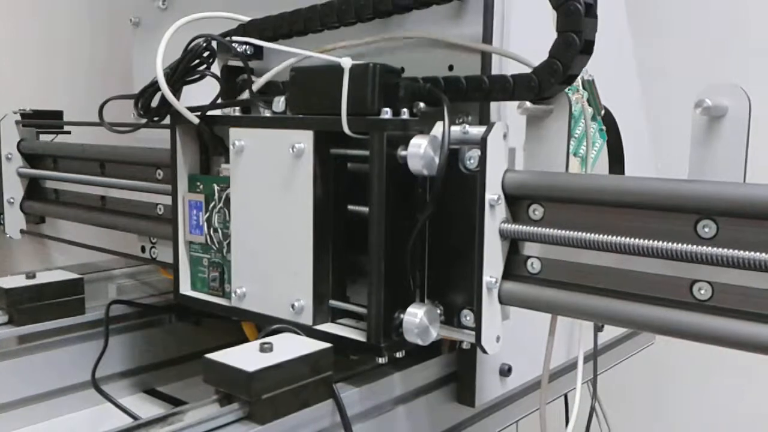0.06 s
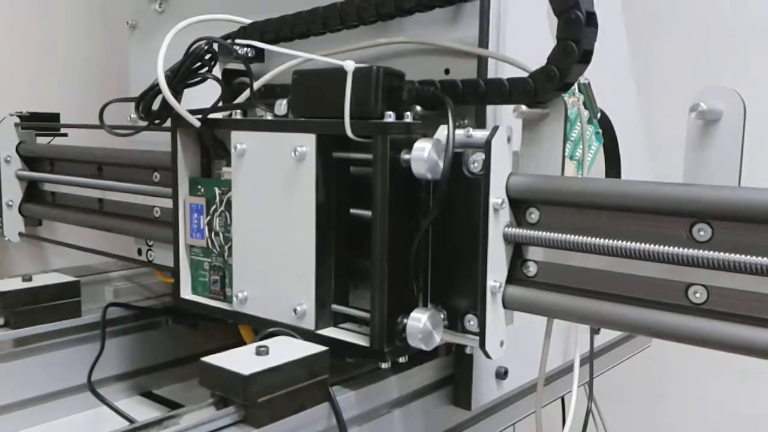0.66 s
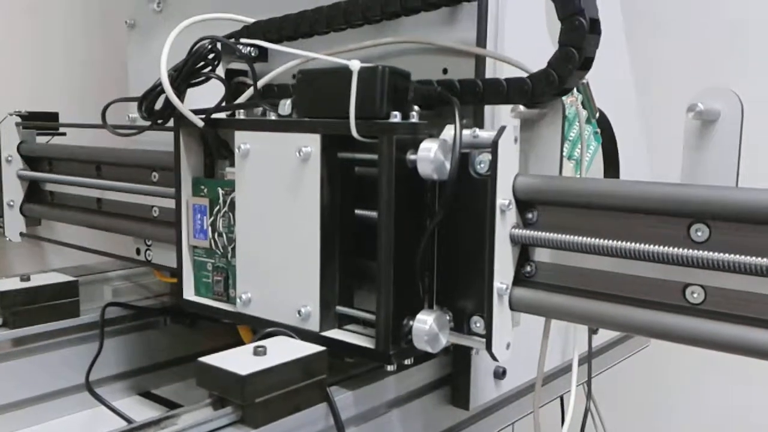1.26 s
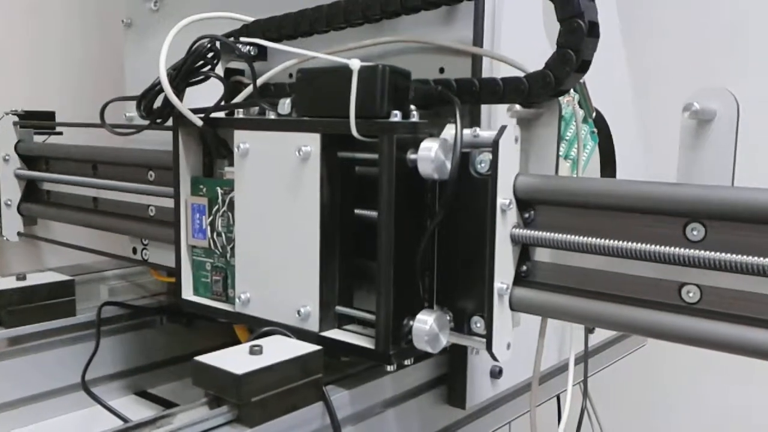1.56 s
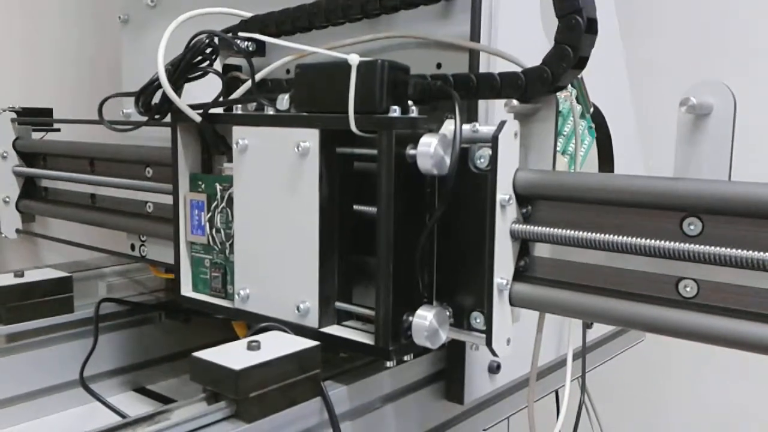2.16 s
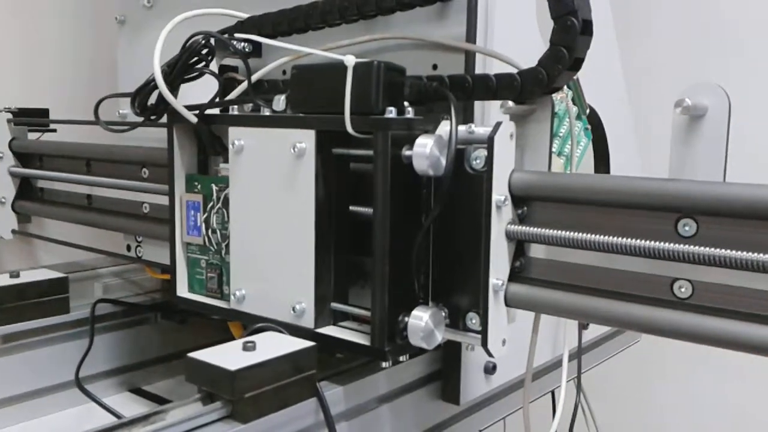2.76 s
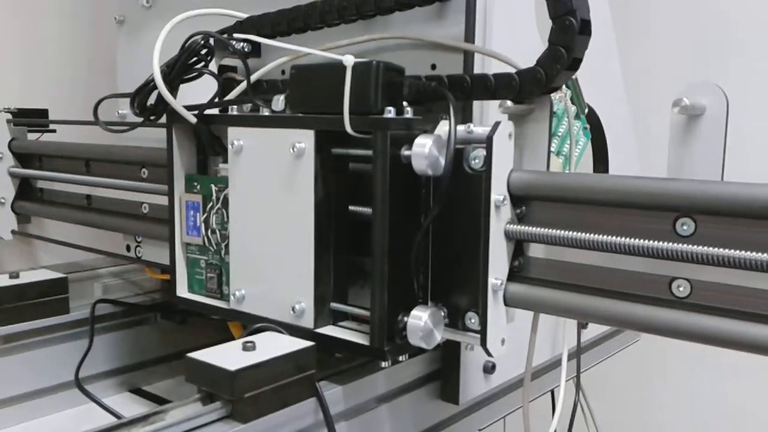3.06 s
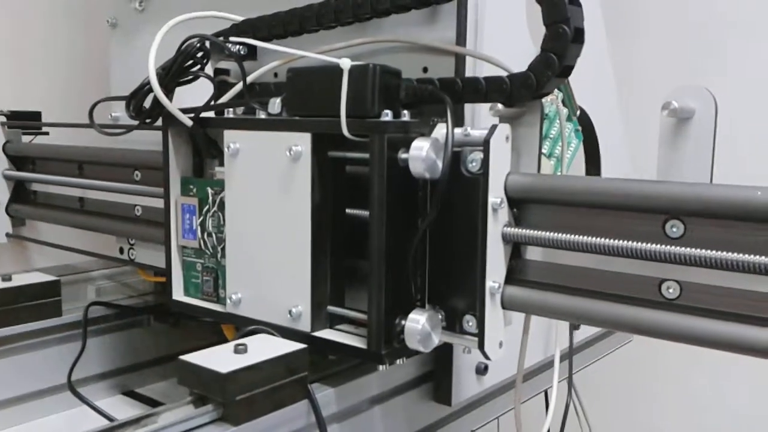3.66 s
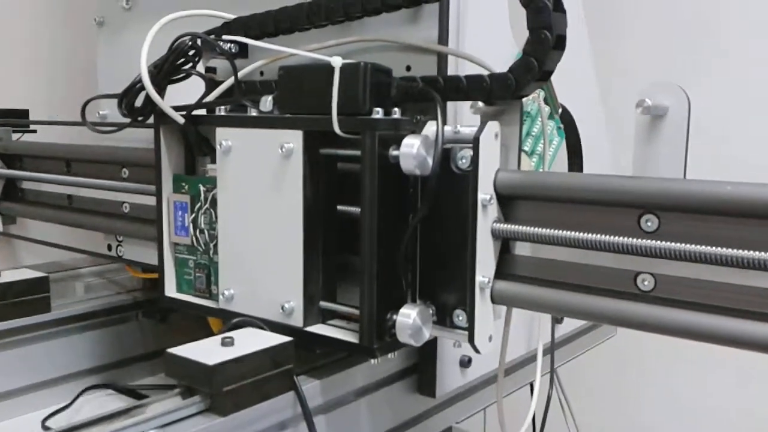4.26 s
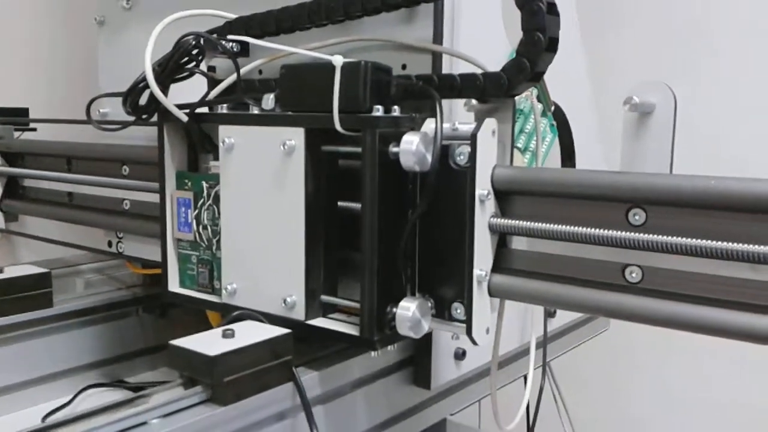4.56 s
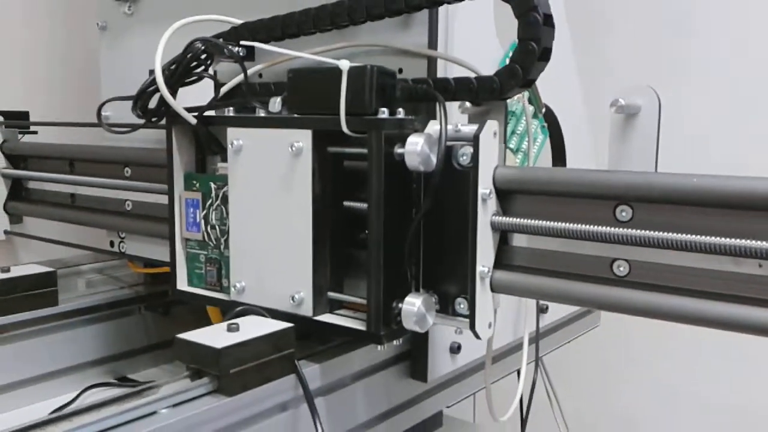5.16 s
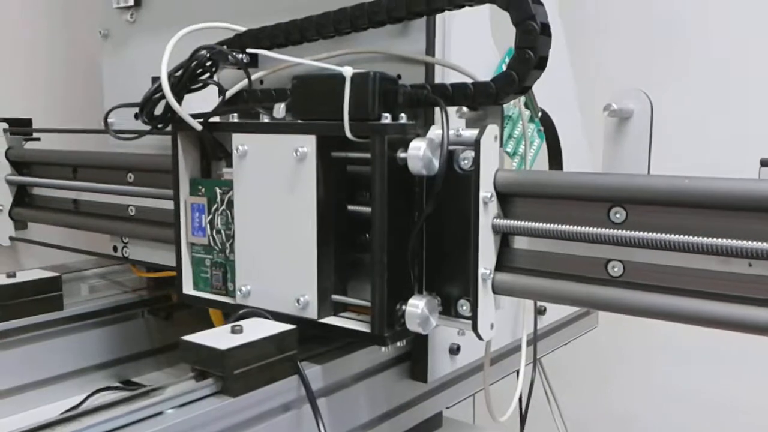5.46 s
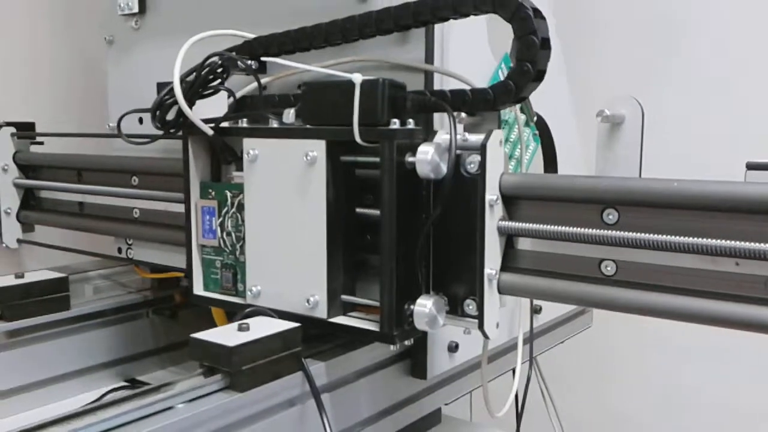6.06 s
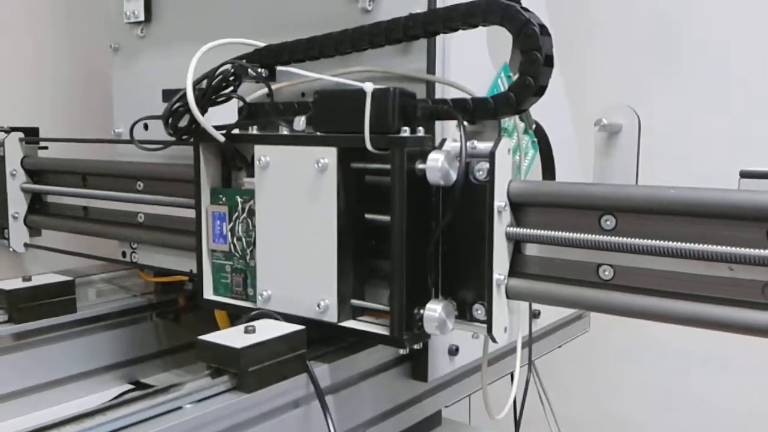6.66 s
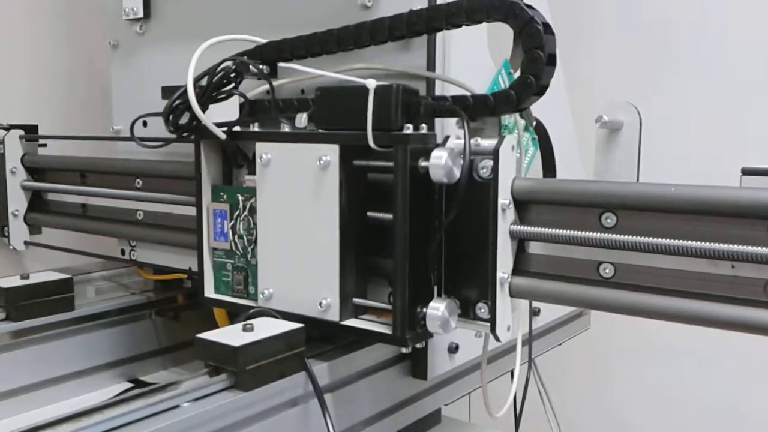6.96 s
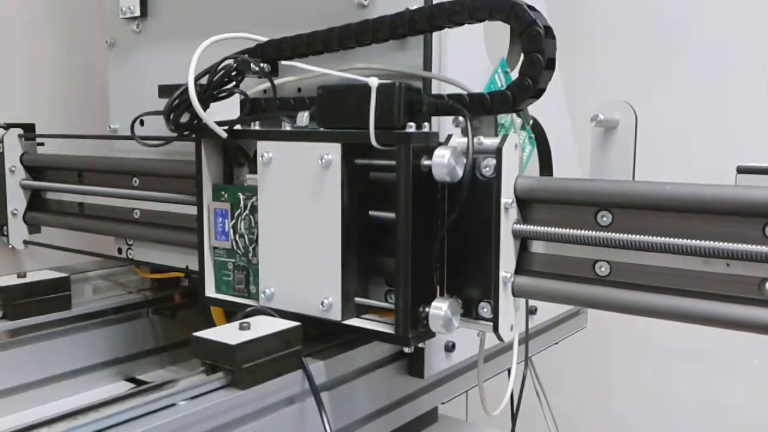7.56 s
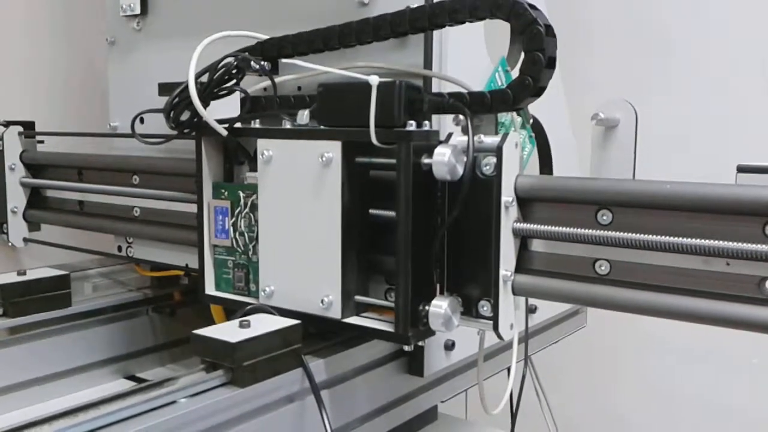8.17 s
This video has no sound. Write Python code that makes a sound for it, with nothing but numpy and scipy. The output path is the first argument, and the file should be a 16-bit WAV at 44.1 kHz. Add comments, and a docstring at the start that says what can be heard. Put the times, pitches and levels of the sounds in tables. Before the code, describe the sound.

A motorised carriage runs with a whine and metallic rattle, stops briefly, whirs back up for a longer run, then winds down.

```python
"""Stepper motor on a lead screw

A stepper drives a carriage along a screw, stops, ramps up, runs back and stops again.
The steps whine, swelling once per screw turn. The screw's roughness rattles the frame, which shudders
at middle speeds; rough overtones chirp on the ramps. The motor housing rings, the bearings hiss
and a cooling fan hums in a small workshop."""
import sys
import numpy as np
from scipy import signal
from scipy.fft import rfft, irfft, next_fast_len
from scipy.io import wavfile
from scipy.ndimage import map_coordinates

SR = 44100
rng = np.random.default_rng(int(sys.argv[2]) if len(sys.argv) > 2 else 0)


def pcm_store(signal):
    """Save signal as 16-bit PCM."""
    levels = np.round(np.clip(np.atleast_2d(signal), -1, 1) * 32767)
    wavfile.write(sys.argv[1], SR, levels.astype(np.int16).T)


N = 371753

STEPS_PER_TURN, CRUISE_STEPS_PER_S = 300, 1172
# Carriage moves. Each row: start, start of braking, one pass of the screw's tight spot, all in seconds.
MOVES_S = [(-1, 1.722, .077), (3.022, 7.49, 3.9)]
# Spin-up: creep, lurch, sag, climb. Each row: seconds since the start, speed as a share of cruise.
SPIN_UP = [(0, 0.0019), (.025, .17), (.075, .52), (.105, .555), (.19, .46), (.23, .51), (.3, .657),
           (.39, .775), (.49, .925), (.56, 0.98), (.66, 1)]
# Step harmonics. Each row: cruise level in dB, its speed exponent, mid-speed base level in dB,
# roughness 0-1, swell per turn in dB, swell lag in turns.
STEP_HARMONICS = [(-35.8, 4.2, -42.5, 0.2, 4.7, 0), (-40.5, 14, -57, 0.2, 1.9, 0.71),
                  (-34.3, 26, -50, 0.15, 1.6, 0)]
# Drift along the travel. Each row: time in seconds, offsets in dB for frame, nut, housing
# and harmonics 1 to 3, swell depth factor.
TRAVEL_DRIFT = [(0, 2.5, -1.172, 0.9, 0.5, 1.5, 0, 0.85), (1.7, 1.9, -0.1, 0.8, -0.5, 2.5, 0.5, 1.05),
                (3.6, 1, 0.4, 1.5, -0.5, -1.5, -1, 0.9), (4.3, 1, 0.15, 0, -3.5, 0.5, 0, 1.1),
                (5.2, -0.5, -0.041, -1.998, -1.3, -5, 2.5, 1),
                (6.2, -1.3, 0.19, -1.5, -0.5, -0.5, 3.5, 1.05), (7.45, -2.968, 0.16, 1, 0.7, -2, 1.3, 0.75)]
# Drive train tones; sidebands of step harmonic 2. Each row: cycles per turn, base level in dB.
DRIVE_ORDERS = [(30, -61), (80, -50), (90, -47.5), (120, -57.5), (150, -47.5), (156, -45), (160, -39.8),
                (164, -46), (170, -47.5), (180, -47), (184, -47.5), (190, -45), (220, -47), (240, -41),
                (288, -49), (320, -43.5), (330, -46.5), (360, -44), (380, -45), (420, -45), (474, -53),
                (520, -52), (680, -58), (818, -45.5), (836, -51), (980, -54), (1074, -52), (1203, -47.5),
                (1235, -46.5), (1252, -52), (1500, -64), (1800, -70), (2100, -61)]
SIDEBAND_ORDERS = [(598, -51), (604, -43), (610, -45), (612, -43)]
# Sideband strength. Each row: time in seconds, gain in dB.
SIDEBAND_GAIN = [(1.7, -9.5), (3.6, -22), (5, -3.5), (7.5, -3)]
# Drive of frame, nut, housing, bearings. Each entry: base level in dB, share of cruise for full drive,
# speed exponent below that, push gain in dB, swell per turn in dB, swell lag in turns,
# after-ring level in dB, its decay in dB/s.
PART_DRIVE = {"frame": (-34.5, 0.83, 2.5, 5.5, 0.95, 1.5, -1, 90),
              "nut": (-35.5, 0.8166, 1.6, -2, 0.57, 2, -1.5, 84),
              "housing": (-36.5, 0.82, 1, 3, 0.5, 0, -1.5, 95),
              "bearings": (-41.5, 0.83, 2.5, -2.5, 0, 0, -6, 110)}
# Spectra of the parts, the ramp overtones and the air. Each row: frequency in Hz, relative level in dB.
BED_SPECTRUM = [(65, -45), (100, -19), (122, -9.5), (170, -5), (250, -2.5), (320, -3.5), (420, 0.5),
                (480, -1.5), (560, -3.5), (800, -35)]
FRAME_SPECTRUM = [(480, -50), (565, -32), (605, -1.5), (690, -0.5), (790, -4), (905, -7.5), (970, -4.5),
                  (1060, -3.5), (1130, -2.5), (1300, -47)]
NUT_SPECTRUM = [(900, -33), (1080, -1), (1300, -.5), (1510, -0.5), (1640, 0.5), (1850, -5), (1950, -8.5),
                (2200, -7), (2350, -3.5), (2500, -9.5), (2800, -10), (3100, -5.5), (3220, 0.5), (3360, -9),
                (3520, -0.5), (3900, -19), (5000, -51)]
HOUSING_SPECTRUM = [(2500, -44), (3400, -12), (3750, -4.5), (3950, -5), (4120, 0.5), (4250, -2.5),
                    (4420, -3), (4570, -9), (4700, -3), (4880, -4), (5060, -19.5), (5400, -14), (6200, -29),
                    (9000, -40)]
BEARING_SPECTRUM = [(4000, -7), (5350, 4.5), (5800, -1), (6300, 1.5), (6850, -2.5), (7100, -4.5),
                    (7500, -2.5), (8200, -1), (8750, -7.5), (9600, -2.5), (10600, 0), (11500, -0.5),
                    (12700, -5.5), (14300, -20)]
FLANGE_SPECTRUM = [(4450, -30), (4620, -14), (4690, -2), (4750, -7.5), (4820, 3.5), (4910, -3), (4980, -12),
                   (5100, -32)]
CHIRP_SPECTRUM = [(500, -25), (950, -9), (1150, 3), (1350, -12), (1570, 3), (1750, -12), (2000, -13),
                  (2300, -6), (2650, -19), (3090, 5), (3350, -7), (3750, 3), (4250, -5), (4550, -12),
                  (4850, -12), (5150, -17), (5500, 2), (5800, -13), (8000, -24)]
AIR_SPECTRUM = [(25, -28), (55, -26.5), (120, -7.5), (180, 1), (230, -2.5), (300, -0.5), (430, -6.5),
                (560, -8), (800, -6.5), (1150, -12), (1700, -10), (3000, -21), (4300, -23), (5700, -30),
                (8000, -26.5), (14400, -25.5)]
# Resonances. Each row: centre in Hz, width in Hz, weight in dB before squaring.
BED_BENDING_MODES = [(282, 50, 0)]
FRAME_MODES = [(662, 28, -6.5), (756.6, 54, -2)]
HOUSING_MODES = [(4230, 190, 0)]
# Bursts on the ramps. Each row: centre in seconds, half length in seconds, peak gain in dB.
FRAME_SHUDDERS = [(1.748, 0.0072, -32), (1.773, 0.0086, -32), (3.309, 0.021, -25.5), (3.353, 0.014, -26.5),
                  (3.422, 0.013, -21.5), (3.521, 0.037, -37), (7.531, 0.008, -23.5), (7.596, 0.0047, -31.5)]
HOUSING_BUZZES = [(1.757, .008, -38), (1.845, .022, -39.5), (3.066, .025, -44.5), (3.335, .02, -37),
                  (3.395, .02, -36.5), (7.618, .017, -39.5)]
# Fan blade tones. Each row: frequency in Hz, level in dB.
FAN_TONES = [(179, -66), (200, -75), (300, -56.5), (399, -61.5), (465, -65), (700, -69.5), (798, -65.5),
             (1453, -85), (1771, -69.5)]


def motion(brake_s=.105, drag=.05, push_s=.48):
    """Speed (1 = cruise), screw turns, angle past the tight spot in turns, starting push (0-1)."""
    t = np.arange(N) / SR
    speed, angle, push = np.zeros((3, N))
    turned = lambda v: np.cumsum(v) * CRUISE_STEPS_PER_S / SR / STEPS_PER_TURN
    for start_s, stop_s, tight_s in MOVES_S:
        age_s = t - start_s
        slowing = np.clip((1 + drag) * np.exp(-np.maximum(t - stop_s, 0) / brake_s) - drag, 0, 1)
        move = np.interp(age_s, *np.transpose(SPIN_UP), left=0, right=1) * slowing
        speed += move
        angle = np.where(age_s > 0, turned(move) - np.interp(tight_s, t, turned(move)), angle)
        push += (age_s > 0) * np.exp(-(age_s / push_s) ** 4)
    return speed, turned(speed), angle, push


def hunting(angle, wander_steps=.1, lag_steps=.085):
    """Rotor offset in turns: it falls behind once a turn and wanders slowly."""
    return (wander_steps * wobble(2.5) - lag_steps * np.sin(2 * np.pi * angle)) / STEPS_PER_TURN


def swell(angle, lag_turns, per_rev=1):
    """Load cycle around the screw: broad crests, narrow dips."""
    phase = 2 * np.pi * per_rev * (angle - lag_turns)
    return np.cos(phase) - .15 * np.cos(2 * phase)


def step_whine(turns, speed, angle, waver_db=.6):
    """Step harmonics swell each turn; uneven load jitters the rotor, most when slow."""
    lag_rad = .099 * screw_profile(turns, points=20) + .26 * wobble(14)
    phase = 2 * np.pi * STEPS_PER_TURN * turns + lag_rad
    *drifts_db, depth = curves(TRAVEL_DRIFT)[3:]
    slow = below_cruise(speed)
    jitter_rad = .15 + .3 * slow
    out = np.zeros(N)
    for k, (row, drift_db) in enumerate(zip(STEP_HARMONICS, drifts_db), 1):
        cruise_db, exponent, middle_db, roughness, swell_db, lag_turns = row
        cruising = amp(cruise_db + drift_db + swell_db * depth * swell(angle, lag_turns))
        ramping = amp(middle_db) * speed ** 2 * np.sqrt(slow)
        gain = np.hypot(cruising * speed ** exponent, ramping)
        flutter = .8 * screw_profile(turns, points=24) + wobble(80)
        tone = sine(k * phase + jitter_rad * wobble(70)) * (1 + roughness * flutter)
        out += gain * amp(waver_db * wobble(20)) * unit(tone)
    return out


def drive_train(turns, speed, waver_db=2.5, drift_rad=.66):
    """Pulley teeth and bearings sing at multiples of the screw rate; sidebands beat with the whine."""
    def tones(rows):
        return sum(amp(db + waver_db * wobble(12))
                   * sine(2 * np.pi * order * turns + drift_rad * wobble(13)) for order, db in rows)
    sideband_db, = curves(SIDEBAND_GAIN)
    return speed ** 5 * (amp(.15) * tones(DRIVE_ORDERS) + amp(sideband_db) * tones(SIDEBAND_ORDERS))


def ramp_chirps(turns, speed, push, base_db=-35.5, no_push_db=-9, jitter_rad=.48, roughness=.55):
    """Jerky steps on the ramps: rough overtones sweep through the structure's resonances."""
    phase = 2 * np.pi * STEPS_PER_TURN * turns
    overtones = sum(sine(k * phase + rng.uniform(0, 2 * np.pi) + jitter_rad * wobble(120))
                    * (1 + roughness * wobble(130)) for k in range(1, 9))
    level_db = base_db + no_push_db * (1 - push ** .25)
    drive = amp(level_db) * speed ** 2.4 * np.sqrt(below_cruise(speed, exponent=8))
    return shaped(drive * overtones, CHIRP_SPECTRUM)


def step_jolts(turns, jitter_rad=.3):
    """Each step kicks the structure: a buzz led by even harmonics."""
    phase = 2 * np.pi * STEPS_PER_TURN * turns
    force = np.zeros(N)
    for k in range(2, 8):
        weight = (.35 if k % 2 else 1) / k ** .28
        force += weight * sine(k * phase + rng.uniform(0, 2 * np.pi) + jitter_rad * wobble(70))
    return unit(force)


def scraping(turns, repeat, bumps_db):
    """Contact force: a repeating share of surface roughness plus fresh friction, peaking on bumps."""
    samples_per_turn = round(SR * STEPS_PER_TURN / CRUISE_STEPS_PER_S)
    pattern = rng.standard_normal(samples_per_turn)
    surface = pattern[np.round(turns * samples_per_turn).astype(int) % samples_per_turn]
    repeat = np.clip(repeat, 0, 1)
    force = np.sqrt(repeat) * surface + np.sqrt(1 - repeat) * rng.standard_normal(N)
    return force * amp(bumps_db * screw_profile(turns, points=160))


def part_gains(speed, angle, push, unsteady_db=.3302):
    """Frame, nut, housing and bearing gains: each follows speed, push and angle, then rings on."""
    frame_db, nut_db, housing_db, *_, depth = curves(TRAVEL_DRIFT)
    coupling_db = 1.9 * swell(angle, lag_turns=-.079, per_rev=3)
    gains = []
    for row, drift_db in zip(PART_DRIVE.values(), [frame_db + coupling_db, nut_db, housing_db, 0]):
        base_db, full_speed, exponent, push_db, swell_db, lag_turns, tail_db, decay_db_per_s = row
        load_db = push_db * push + swell_db * depth * swell(angle, lag_turns)
        level_db = base_db + drift_db + load_db + unsteady_db * wobble(17)
        drive = np.minimum(speed / full_speed, 1) ** exponent
        gains.append(ringing_on(drive, tail_db, decay_db_per_s) * amp(level_db))
    return gains


def structure(turns, speed, frame_gain, nut_gain, housing_gain, bearing_gain):
    """Screw and nut shake bed, frame and housing; bearings hiss. Steps kick through below cruise."""
    slow = below_cruise(speed)
    kicks = np.sqrt(slow) * speed * step_jolts(turns)
    rub = lambda repeat, bumps_db: scraping(turns, repeat * speed ** 4, bumps_db)
    rumble = amp(-49) * speed ** .41 * coloured(rub(.52, -.5), BED_SPECTRUM)
    growl = amp(-39.5) * speed ** 2 * slow ** .19 * resonating(rng.standard_normal(N), BED_BENDING_MODES)
    rattle = frame_gain * amp(-2) * metal(rub(.5, 1.5), FRAME_SPECTRUM, ring=.43)
    grind = nut_gain * amp(2) * metal(rub(.4, -.5) + .5 * kicks, NUT_SPECTRUM, ring=.55)
    ring = housing_gain * amp(.3) * metal(rub(.23, 3) + .09 * kicks, HOUSING_SPECTRUM, ring=.52)
    sing = housing_gain * slow * amp(-3) * resonating(rng.standard_normal(N) + .37 * kicks, HOUSING_MODES)
    bearing_force = rub(.13, 1.5) + .38 * kicks
    hiss = bearing_gain * amp(.7) * metal(bearing_force, BEARING_SPECTRUM, ring=1, t60_s=.072)
    return rumble + growl + rattle + grind + ring + sing + hiss


def flange_rasp(turns, speed, housing_gain):
    """The bearing rubs the motor flange into a metallic rasp."""
    force = scraping(turns, repeat=.16 * speed ** 4, bumps_db=1)
    return housing_gain * amp(-6) * np.sqrt(np.clip(speed, .5, 1)) * coloured(force, FLANGE_SPECTRUM)


def frame_shudder(speed):
    """Frame modes murmur at middle speeds and flare in timed bursts; the joints limit the swing."""
    murmur = amp(-31) * speed ** 3 * below_cruise(speed)
    gain = ringing_on(np.hypot(bursts(FRAME_SHUDDERS), murmur), tail_db=-10, decay_db_per_s=85)
    swing = np.tanh(2 * resonating(rng.standard_normal(N), FRAME_MODES))
    return gain * coloured(swing, FRAME_SPECTRUM)


def housing_buzz(turns, speed, chatter_db=2.5):
    """Steps set the housing chattering in timed bursts; slow ones also rattle flange and nut."""
    kicks = step_jolts(turns)
    chatter = amp(chatter_db * wobble(130))
    force = lambda: (rng.standard_normal(N) + .5 * kicks) * chatter
    rattle = amp(-1) * coloured(force(), FLANGE_SPECTRUM) + amp(-2) * coloured(force(), NUT_SPECTRUM)
    ring = amp(-1) * resonating(force(), HOUSING_MODES)
    gain = ringing_on(bursts(HOUSING_BUZZES), tail_db=-14.5, decay_db_per_s=109)
    return gain * (ring + below_cruise(speed, exponent=2) * rattle)


def cooling_fan(air_db=-51):
    """Slightly unsteady blade tones over steady air noise."""
    t = np.arange(N) / SR
    hum = sum(amp(db + wobble(4.6)) * sine(2 * np.pi * hz * t + .5 * wobble(6)) for hz, db in FAN_TONES)
    return np.sqrt(2) * hum + amp(air_db) * coloured(rng.standard_normal(N), AIR_SPECTRUM)


def metal(force, spectrum, ring, t60_s=.079):
    """Metal part: a broad spectrum rippled by close, briefly ringing modes."""
    return coloured(force + ring * tail(force, t60_s), spectrum)


def tail(x, t60_s):
    """Dense ringing of a room or metal part, at about the energy of x."""
    t = np.arange(int(SR * t60_s)) / SR
    response = rng.standard_normal(len(t)) * amp(-60 * t / t60_s) * (t > .003)
    return signal.oaconvolve(x, response / np.linalg.norm(response))[:N]


def ringing_on(gain, tail_db, decay_db_per_s):
    """Gain that rises at once and leaves a decaying after-ring."""
    fall_db = decay_db_per_s * np.arange(N) / SR
    held_db = np.maximum.accumulate(20 * np.log10(gain + 1e-9) + fall_db) - fall_db
    return np.maximum(gain, amp(held_db + tail_db))


def below_cruise(speed, exponent=4):
    """1 at rest, 0 at cruise."""
    return np.clip(1 - speed ** exponent, 0, 1)


def bursts(rows):
    """Gain of bell-shaped bursts."""
    t = np.arange(N) / SR
    return sum(amp(db) * np.exp(-((t - centre_s) / half_s) ** 2 / 2) for centre_s, half_s, db in rows)


def screw_profile(turns, points):
    """Random profile around the screw, repeated each turn."""
    profile = np.tile(rng.standard_normal(points), int(turns[-1]) + 2)
    return np.interp(turns * points, np.arange(len(profile)), profile)


def wobble(rate_hz, hop=128):
    """Smooth random curve, rate_hz knots a second."""
    knots = rng.standard_normal(int(N * rate_hz / SR) + 5)
    coarse = map_coordinates(knots, [np.arange(N // hop + 2) * hop * rate_hz / SR])
    return np.interp(np.arange(N) / hop, np.arange(len(coarse)), coarse)


def curves(rows):
    """Per-sample curve for each column after the time."""
    times_s, *columns = np.transpose(rows)
    return [np.interp(np.arange(N) / SR, times_s, column) for column in columns]


def resonating(x, modes):
    """x through steep-sided resonances, at rms 1."""
    def response(hz):
        return sum(amp(db) * 1j * hz * width / (centre ** 2 - hz ** 2 + 1j * hz * width)
                   for centre, width, db in modes) ** 2
    return unit(filtered(x, response))


def coloured(x, spectrum):
    """x shaped by a spectrum, at rms 1."""
    return unit(shaped(x, spectrum))


def shaped(x, spectrum):
    """x through a gain curve interpolated in log frequency."""
    points_hz, db = np.transpose(spectrum)
    return filtered(x, lambda hz: amp(np.interp(np.log(hz + 1), np.log(points_hz), db, -90, -90)))


def filtered(x, response):
    """x through a frequency response."""
    size = next_fast_len(N + SR // 4)
    return irfft(rfft(x, size) * response(np.fft.rfftfreq(size, 1 / SR)), size)[:N]


def sine(phase_rad):
    """Single-precision sine."""
    return np.sin(phase_rad.astype(np.float32))


def amp(db):
    """Decibels to gain."""
    return 10 ** (db / 20)


def unit(x):
    """Scale to rms 1."""
    return x / np.sqrt(np.mean(x ** 2) + 1e-20)


def scene():
    """One shaft motion drives the machine; faint workshop reverb and a fan lie behind it."""
    speed, turns, angle, push = motion()
    frame_gain, nut_gain, housing_gain, bearing_gain = part_gains(speed, angle, push)
    rotor = turns + hunting(angle)
    machine = step_whine(rotor, speed, angle) + drive_train(rotor, speed)
    machine += ramp_chirps(rotor, speed, push)
    machine += structure(turns, speed, frame_gain, nut_gain, housing_gain, bearing_gain)
    machine += flange_rasp(turns, speed, housing_gain) + frame_shudder(speed) + housing_buzz(turns, speed)
    workshop = amp(-16.5) * tail(machine, t60_s=.55)
    return (machine + workshop + cooling_fan())[None]


def record(dry, cutoff_hz=14500):
    """Brick-wall low-pass."""
    return filtered(dry[0], lambda hz: hz < cutoff_hz)[None]


dry = scene()
out = record(dry)
pcm_store(out)
```